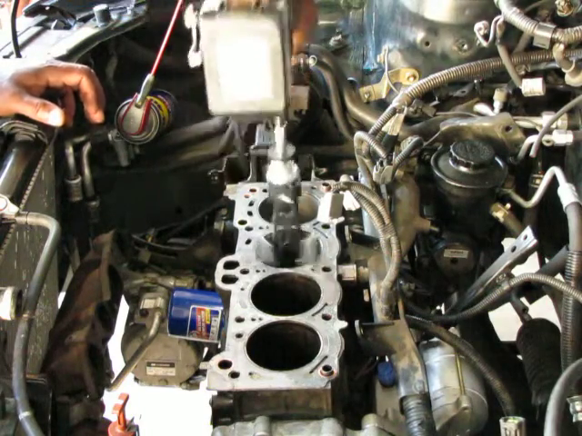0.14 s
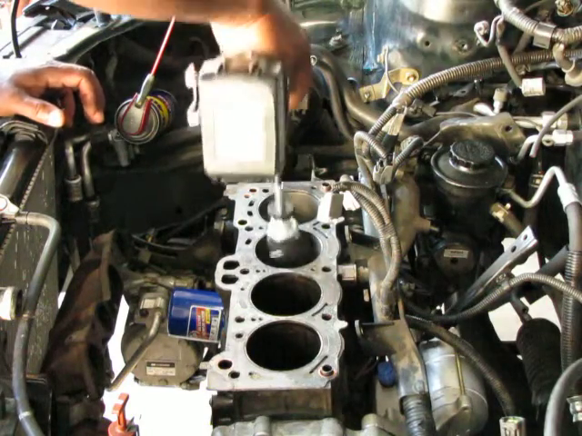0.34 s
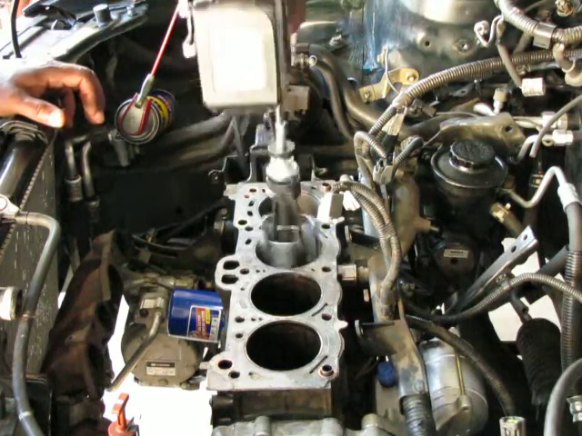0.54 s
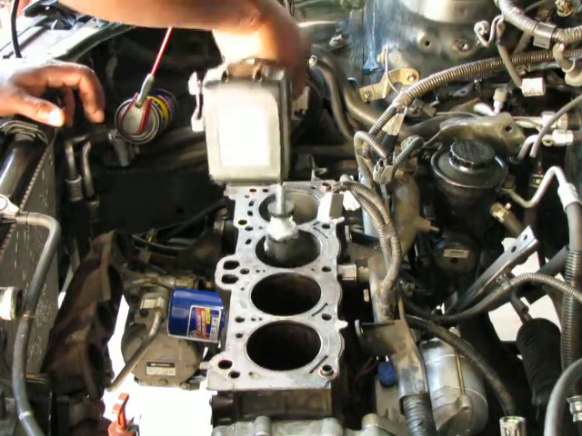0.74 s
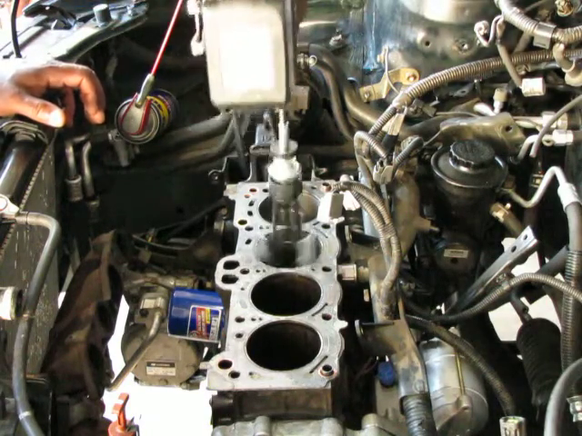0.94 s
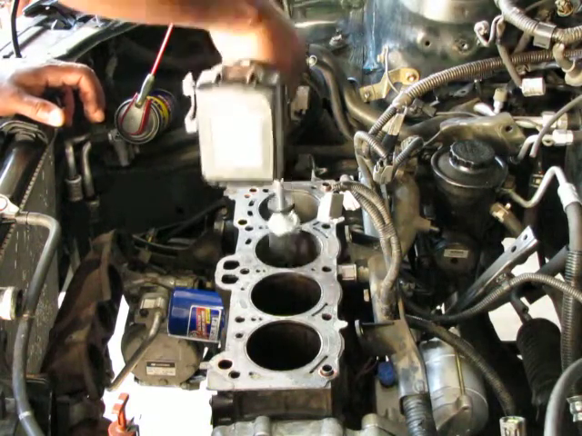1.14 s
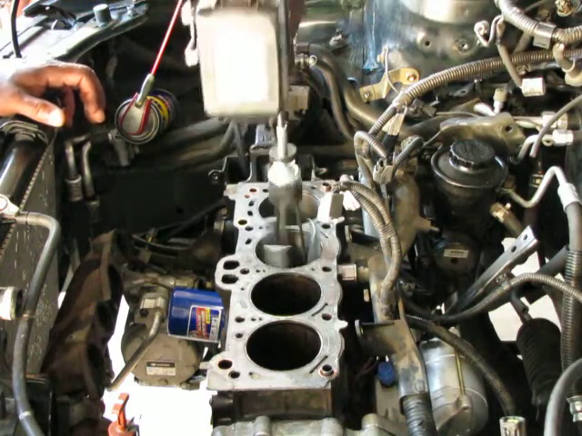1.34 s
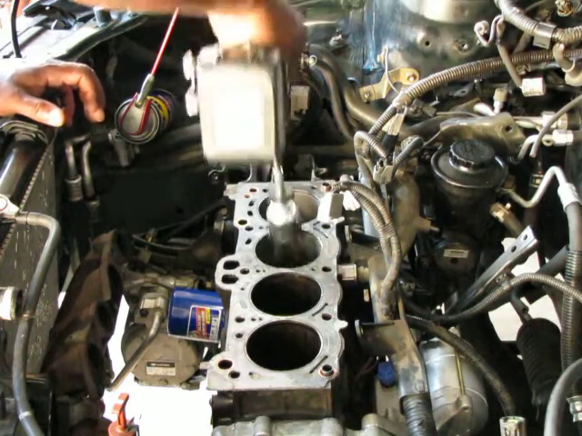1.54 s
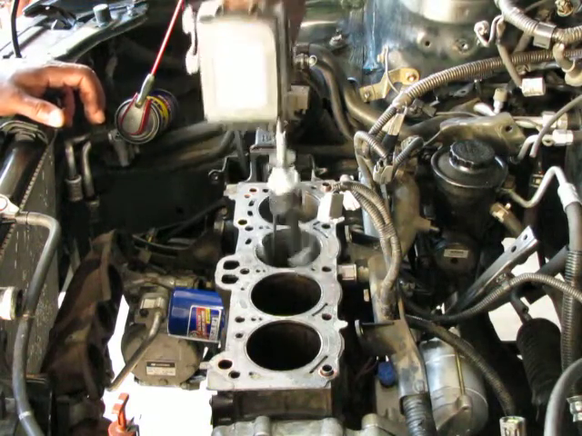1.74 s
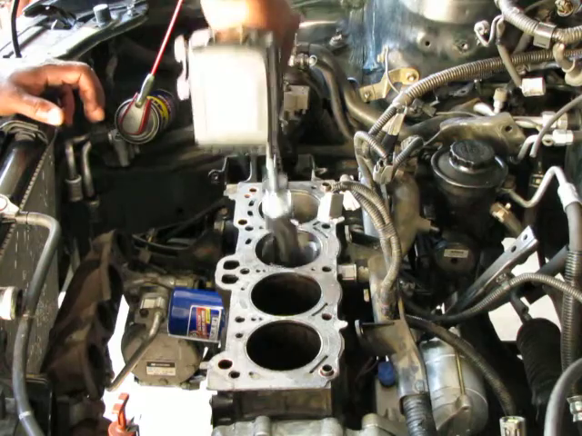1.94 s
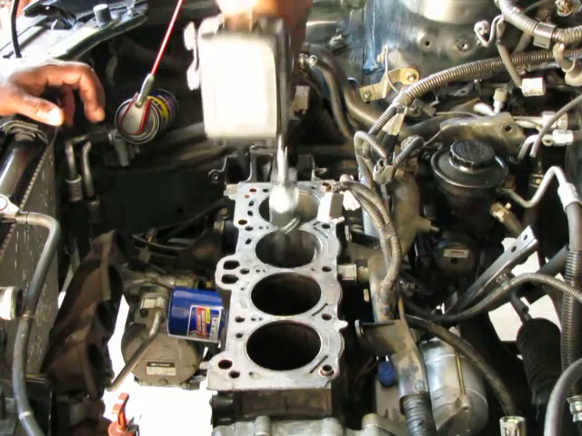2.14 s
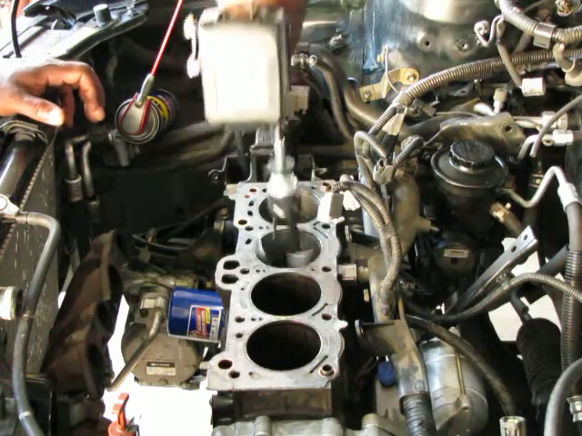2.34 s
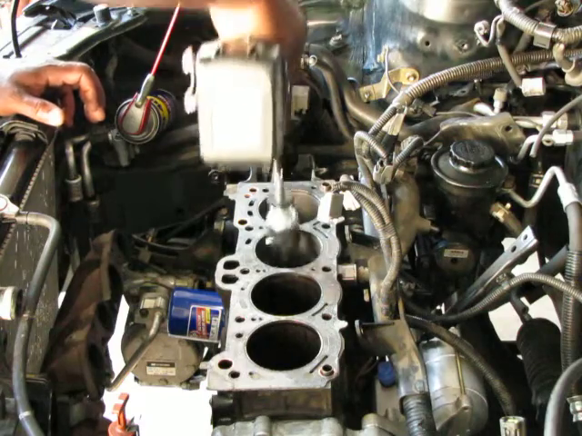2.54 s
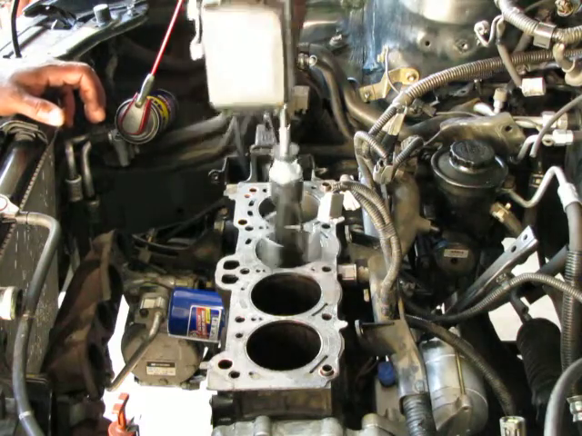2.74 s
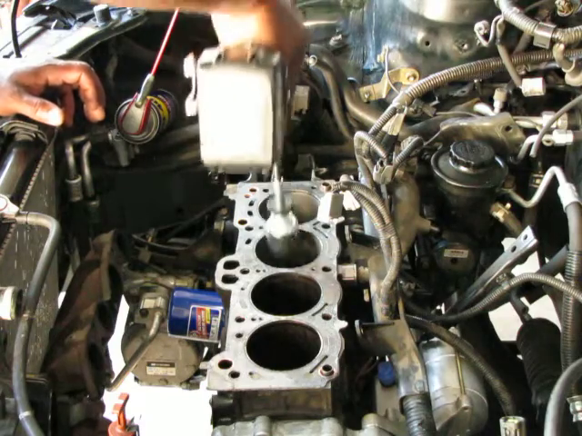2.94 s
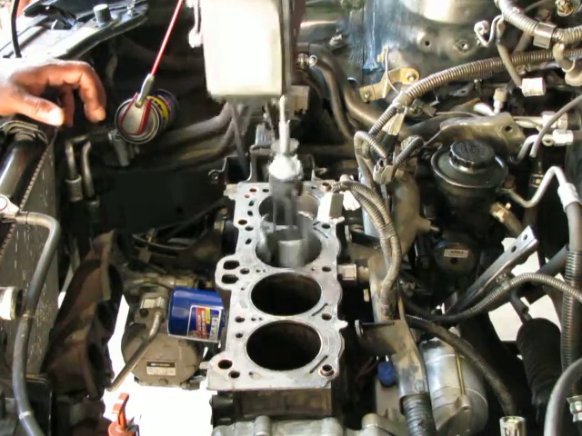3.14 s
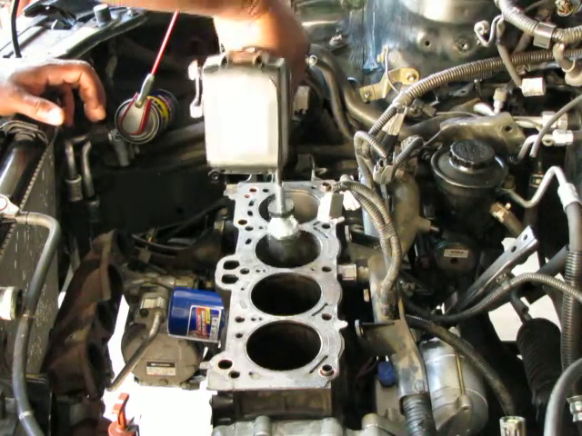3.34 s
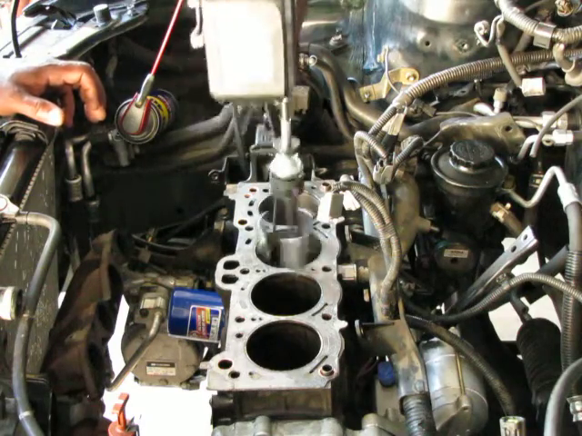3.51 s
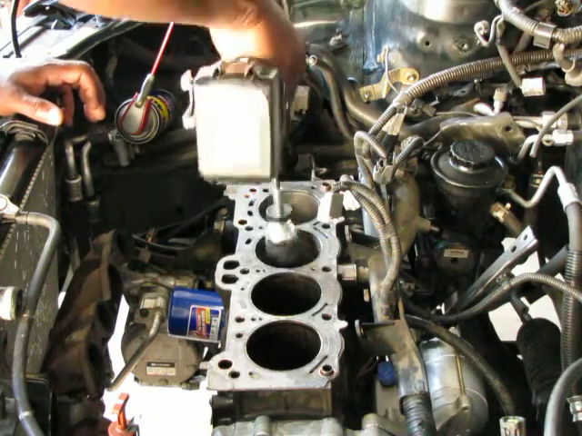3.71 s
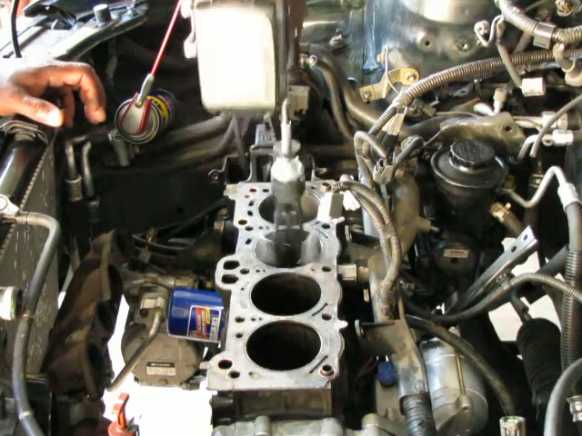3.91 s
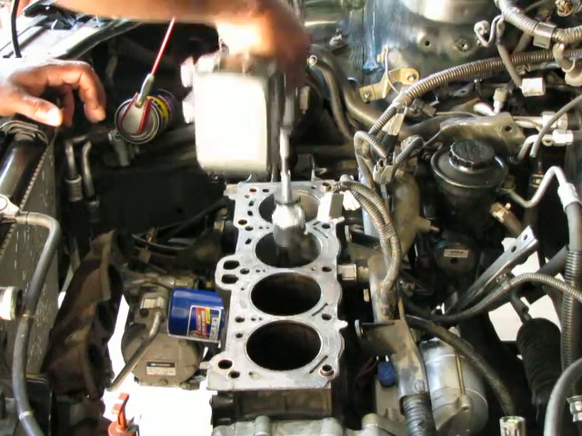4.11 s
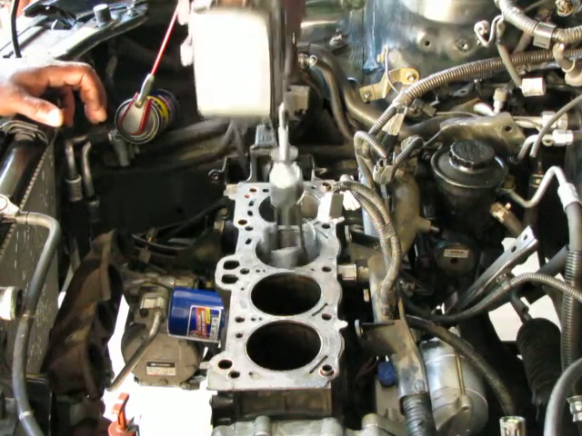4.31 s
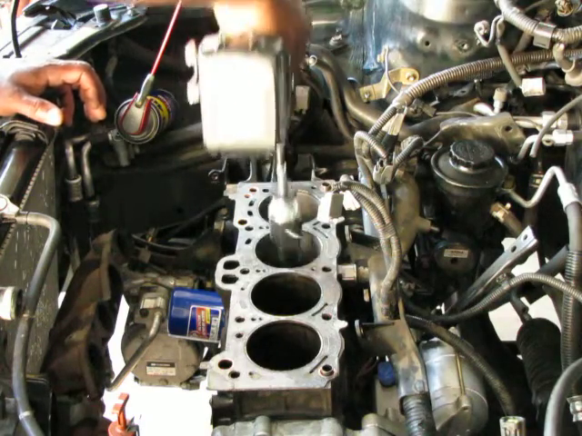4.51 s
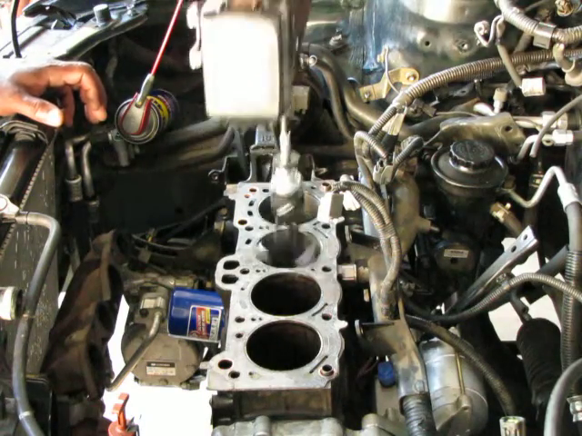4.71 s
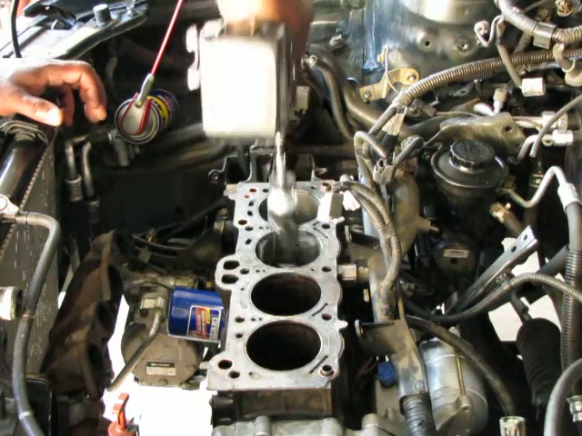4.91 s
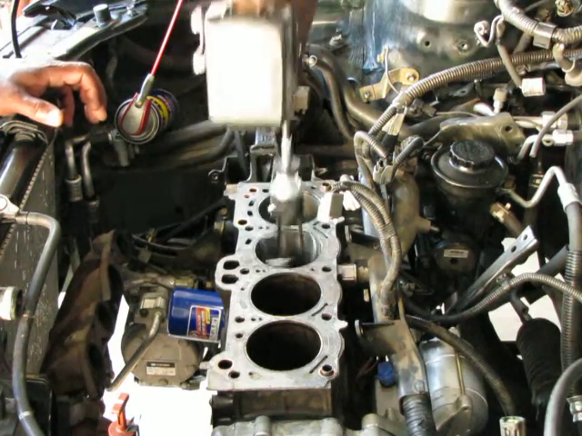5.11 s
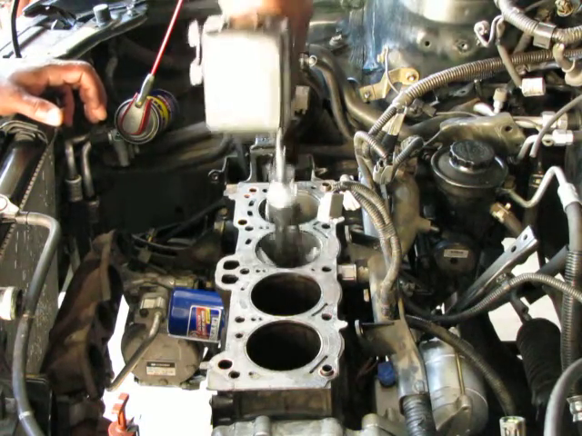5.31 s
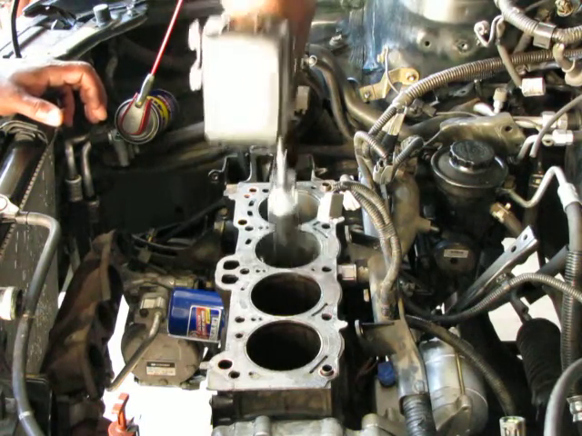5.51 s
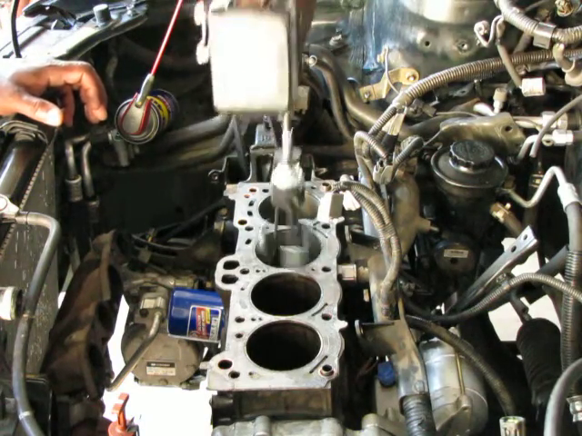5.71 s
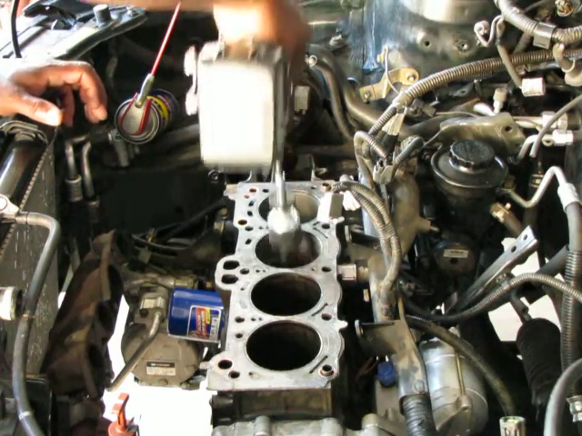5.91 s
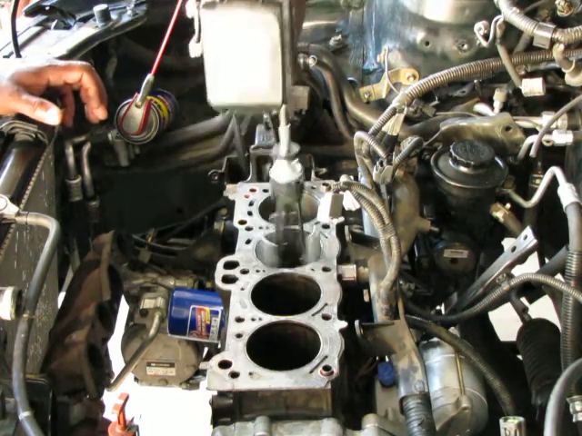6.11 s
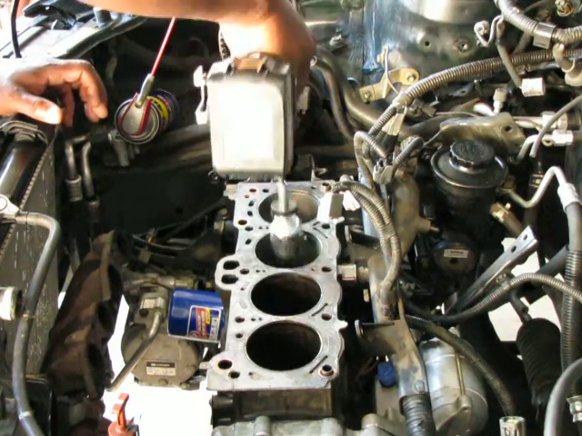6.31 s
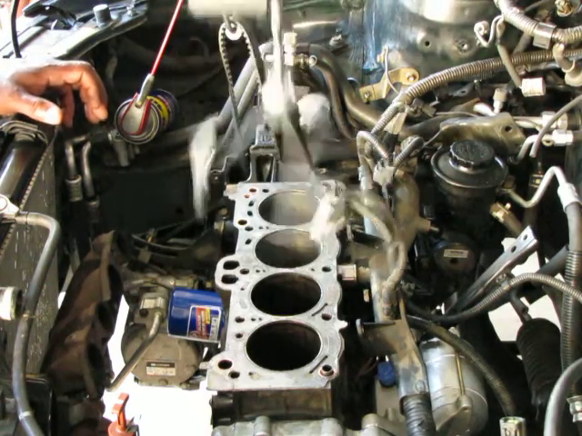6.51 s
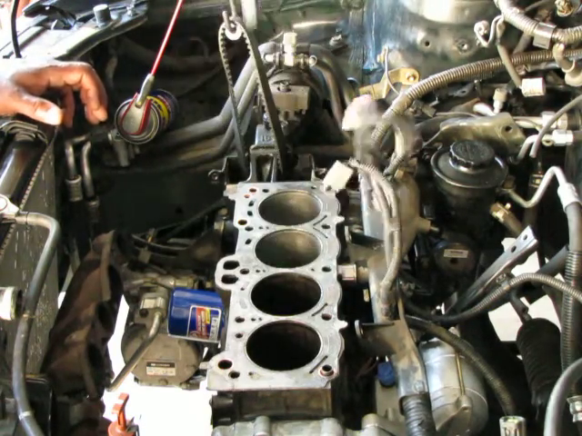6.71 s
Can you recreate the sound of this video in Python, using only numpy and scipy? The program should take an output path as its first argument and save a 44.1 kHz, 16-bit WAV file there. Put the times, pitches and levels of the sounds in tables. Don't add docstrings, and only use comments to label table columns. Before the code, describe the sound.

A cordless drill whines at high pitch as a hone hisses up and down an iron engine cylinder, knocking sharply, then stops and clatters out.

```python
import sys
import numpy as np
from scipy import signal
from scipy.io import wavfile
from scipy.ndimage import uniform_filter1d

SR = 44100
rng = np.random.default_rng(int(sys.argv[2]) if len(sys.argv) > 2 else 0)


def ratio(d):
    e = np.asarray(d, float) / 20
    return 10 ** e


def file_out(sig):
    cols = np.atleast_2d(sig).T
    lim = np.clip(cols, -1, 1)
    pcm = np.round(lim * 32767).astype(np.int16)
    wavfile.write(sys.argv[1], SR, pcm)


N = 297675
T = np.arange(N) / SR
LEFT_RIGHT = np.array([[1], [-1]])
EASE_S = 6.4


def rms_one(x):
    return x / np.sqrt(np.mean(x ** 2) + 1e-20)


def in_time(rows):
    s, *columns = np.transpose(rows)
    return [np.interp(T, s, column) for column in columns]


def at_hz(points, hz):
    table_hz, value = np.array(points).T
    return np.interp(np.log(hz), np.log(table_hz), value)


def drift(rate_hz):
    r = np.exp(-80 * np.pi * rate_hz / SR)
    white = rng.standard_normal(N // 40 + 2002)
    slow = signal.lfilter([1], [1, -2 * r, r * r], white)[2000:]
    return np.interp(np.arange(N) / 40, np.arange(len(slow)), rms_one(slow))


def resonate(x, hz, width_hz):
    r = np.exp(-np.pi * width_hz / SR)
    poles = [1, -2 * r * np.cos(2 * np.pi * hz / SR), r * r]
    return signal.lfilter(np.array([1, 0, -1]) * (1 - r * r) / 2, poles, x)


def add(out, s, x):
    i = round(max(s, 0) * SR)
    out[..., i:i + x.shape[-1]] += x[..., :N - i]


# start_s [s] where the sag is deepest, sag [turns/s], recovery_s [s]
BINDS = [(-0.016, 21.7, 0.167), (0.308, 18.1, 0.175), (0.673, 16.8, 0.15), (1.068, 10.3, 0.35),
         (1.536, 10.7, 0.324), (1.789, 9.3, 0.145), (2.188, 10.2, 0.141), (2.565, 13.0, 0.28),
         (2.956, 11.2, 0.209), (3.285, 16.0, 0.172), (3.631, 12.2, 0.24), (4.103, 14.3, 0.271),
         (4.469, 10.8, 0.193), (4.782, 19.6, 0.155), (5.153, 20.8, 0.145), (5.535, 20.4, 0.214),
         (5.9, 15.8, 0.22), (6.243, 19.6, 0.14), (6.603, 13.5, 0.35)]


def speed():
    start_s, sag, recovery_s = np.transpose(BINDS)
    u = (T[::64, None] - start_s) / recovery_s
    u = np.where(u < 0, -u / 0.69, u)
    free_turns_per_s = 332.7
    return np.interp(T, T[::64], free_turns_per_s - np.exp(-u ** 1.9) @ sag)


# start_s [s], pressure_db [dB], first_mesh_db, second_mesh_db, third_mesh_db [dB] as it tips
STONES = [(0, 7, -16, -3, -2), (.25, 4, 1, -6, 2), (.5, 0, -3, -10, 1.5), (.8, -1, -2, 0.5, 1.5),
          (1.2, .5, -0.5, -1.5, -8), (1.7, -1, -3.5, -1, 2), (2.2, -0.5, -1.5, -4, -1),
          (2.6, 1, -1.5, 1.5, 0), (3.1, 0, -1.5, -6, 0), (3.6, 1, -1.5, -3, -2), (4.1, 1.5, -2, 1, -3),
          (4.55, 5, -1.5, -4.5, 2), (4.8, 2.5, -1, -1.5, 4), (5.05, 3.5, 0, -3.5, 1), (5.5, 2.5, -2, 4, 5),
          (5.75, 2.5, -0.5, 1, 3), (6.1, 4.5, -4, -4.5, 2), (6.3, 6.5, -6, 3, 2)]


def press():
    last_s, last_db = STONES[-1][:2]
    scuff_s, scuff_db = 6.5, 2.5
    held = np.interp(T, [last_s, EASE_S, scuff_s], [0, 1 - last_db, scuff_db - last_db])
    lift_s, lift_db_per_s, floor_db = 6.56, 181, -19.5
    lost = np.clip(lift_db_per_s * (T - lift_s), 0, scuff_db - floor_db)
    bright = np.interp(T, [EASE_S, scuff_s], [0.06, -1.0]) - 0.24 * lost
    return in_time(STONES)[0] + held - lost, bright


# pitch_hz [Hz], likeness of left and right [0 to 1]
LIKENESS = [(40, 0.57), (125, 0.82), (350, 0.92), (700, 0.96), (1400, 0.95), (2800, 0.7), (5600, 0.07),
            (12000, 0.062)]
# pitch_hz [Hz], left_minus_right_db [dB]
LEFT_DB = [(60, -2.5), (180, -1), (550, 0), (1650, -3), (4970, -1), (15000, 0.5)]


def tone(angle, hz, db, slow_db, fast_db, wobble):
    beads = drift(22)
    beads = rms_one(beads - uniform_filter1d(beads, size=SR // 6))
    beads = np.minimum(beads, 1.4)
    level = db + slow_db * drift(5) + fast_db * beads
    level = level + LEFT_RIGHT * (1.2 * min(hz / 2000, 1) * drift(5) + at_hz(LEFT_DB, hz) / 2)
    unlike = 1 - np.clip(at_hz(LIKENESS, hz), 0, 1)
    spread = unlike * LEFT_RIGHT * np.tanh(.8 * drift(4))
    phase = angle + wobble * drift(25) + spread + rng.uniform(0, 2 * np.pi)
    return np.sqrt(2) * ratio(level) * np.sin(phase)


MESH_DB = [-30.5, -27.5, -34.5, -44]
MESH_FLICKER_DB = [3, 4.3, 2.2, 2]
MESH_DULL_DB = [-.15, -.4, -.25, -.1]
# order [multiple of shaft speed], level_db [dB rms]
SHAFT = [(1, -56), (2, -58), (4, -55), (6, -50), (8, -47), (11, -45.5), (12, -45), (14, -49), (16, -48),
         (19, -38), (21, -35), (22, -37.5), (23, -47), (29, -49), (31, -47), (41, -60)]
# order [hundredths of shaft speed], level_db [dB rms]
PLANETS = [(44, -63), (58, -66), (165, -64), (220, -57), (253, -60), (841, -51), (953, -50), (1039, -44)]


def drill():
    turns, tip = speed(), in_time(STONES)[1:]
    angle, mean = 2 * np.pi * np.cumsum(turns) / SR, np.mean(turns)
    unload = sum(np.exp(-((T[::64] - s) / 0.043) ** 2) for s, *_ in RASPS[:15])
    falter = -3 * np.interp(T, T[::64], unload)
    falter = falter + np.interp(T, [STONES[-1][0], EASE_S], [0, -7])
    out = 0
    for k, db in enumerate(MESH_DB):
        order = 10 * (k + 1)
        level = db + tip[[0, 1, 2, 1][k]] + MESH_DULL_DB[k] * (mean - turns) + falter
        out = out + tone(order * angle, order * mean, level, 0, MESH_FLICKER_DB[k], .2 + .13 * k)
    for order, db in SHAFT:
        out = out + tone(order * angle, order * mean, db, 1.5, 3.2, .1 + .012 * order)
    for hundredths, db in PLANETS:
        order = hundredths / 100
        out = out + tone(order * angle, order * mean, db, 2.5, 3, .4)
    stop_s, stop_t60_s = 6.48, 0.19
    return out * ratio(0.5 + press()[0] - 60 * np.maximum(T - stop_s, 0) / stop_t60_s)


# pitch_hz [Hz], level_db [dB]
HISS = [(15, -65), (25, -16.5), (137, -23.5), (284, -28), (316, -30), (437, -26.5), (637, -19.5),
        (2030, -8.5), (3220, -3), (4100, -5), (6490, -5), (8050, -7), (9720, -7.5), (12700, -18.5),
        (15800, -14)]
# pitch_hz [Hz], tilt [octaves]
TILT = [(100, 0), (1000, -2), (4000, 0), (16000, 2)]
# pitch_hz [Hz], width_hz [Hz], level_db [dB]
BODY = [(5000, 1700, 4), (6440, 1800, -1), (8300, 300, 3.5), (11100, 520, -0.5), (12300, 560, 3)]


def stones():
    pressure, bright = press()
    clicks = rng.random(N) < 900 / SR
    grit = 1 + .5 * clicks * ratio(2.6 * np.minimum(rng.exponential(1, N), 4))
    turn = 2 * np.pi * np.cumsum(speed()) / SR
    throb = 1 + .15 * np.sin(turn + drift(3))
    white = rng.standard_normal((2, 2, N)) * uniform_filter1d(grit, size=9) * throb
    together = 1.0 * drift(2.9) + 0.58 * drift(30.0)
    edges = 22 * 2 ** np.arange(0, 9.7, .4)
    out = 0
    for k, (low, high) in enumerate(zip(edges, edges[1:])):
        band = signal.butter(2, [low, high], "band", fs=SR, output="sos")
        mid, side = signal.sosfilt(band, white[k % 2])
        hz = np.sqrt(low * high)
        alike = np.clip(at_hz(LIKENESS, hz), 0, 1)
        left = ratio(at_hz(LEFT_DB, hz) / 2 * LEFT_RIGHT)
        gain = ratio(at_hz(HISS, hz) + together + 1.1 * drift(17.5) + bright * at_hz(TILT, hz))
        out = out + left * gain * (np.sqrt(1 + alike) * mid + np.sqrt(1 - alike) * side * LEFT_RIGHT)
    for hz, width_hz, db in BODY:
        out = out + (ratio(db) - 1) * resonate(out, hz, width_hz)
    return ratio(-22.5 + pressure) * out / np.sqrt(np.mean(out[:, :6 * SR] ** 2))


# peak_s [s], level_db [dB rms]
SWELLS = [
    (1.5, -36),
    (3.5, -39),
    (4.8, -28.5),
    (5.2, -30),
    (5.8, -34),
    (6.3, -27),
]


def bore():
    hz, width_hz = 4460, 91
    mid, side = resonate(resonate(rng.standard_normal((2, N)), hz, width_hz), hz, width_hz)
    swells = [db - 51 * abs(T - s) for s, db in SWELLS]
    level = np.max(swells + [np.full(N, -40)], axis=0)
    level = level - 60 * np.maximum(T - EASE_S, 0) / .5
    return ratio(level) * rms_one(mid + 0.1 * side * LEFT_RIGHT)


def rumble():
    band = signal.butter(2, [30, 500], "band", fs=SR, output="sos")
    mid, side = signal.sosfilt(band, rng.standard_normal((2, N)))
    return ratio(-57.5) * rms_one(mid + 0.13 * side * LEFT_RIGHT)


def ports(shape, unlike):
    mid, side = rng.standard_normal((2, len(shape)))
    return shape * (mid + unlike * side * LEFT_RIGHT)


# pitch_hz [Hz], width_hz [Hz], level_db [dB]
IRON = [(1360, 140, -9.5), (2500, 17, -2), (3180, 160, -8.5), (4130, 13, -29), (4810, 220, -5),
        (5200, 49, 3.5), (5350, 390, 1), (7000, 160, 0), (7230, 60, 4.5), (8040, 31, 4), (8800, 62, 7),
        (13400, 170, -2.5)]


def iron(x, hz, ring_db):
    out = resonate(resonate(x, hz, 1.2 * hz), hz, 1.2 * hz)
    for k, (mode_hz, width_hz, db) in enumerate(IRON):
        near = -6 * abs(np.log2(mode_hz / hz))
        strike = near + rng.normal(0, 3)
        out = out + (-1) ** k * ratio(ring_db + db + strike) * resonate(x, mode_hz, 3 * width_hz)
    return out


# start_s [s],
# length_s [s], level_db [dB rms], pitch_hz [Hz]
RASPS = [(0, 0.023, -22, 5000), (0.028, 0.015, -29, 6000), (0.383, 0.023, -18.5, 4300),
         (0.742, 0.051, -28.5, 3460), (1.119, 0.029, -25.5, 2560), (1.483, 0.038, -24.5, 2500),
         (1.874, 0.026, -23, 3000), (2.226, 0.048, -26.5, 2980), (2.582, 0.041, -23, 3160),
         (2.981, 0.036, -25.5, 2500), (3.333, 0.019, -27, 2500), (3.705, 0.053, -22, 2960),
         (4.048, 0.028, -19, 3500), (4.442, 0.014, -16, 3350), (4.457, 0.013, -19.5, 3490),
         (4.816, 0.013, -27, 4500), (5.116, 0.019, -24, 5300), (5.574, 0.034, -27, 6300),
         (5.946, 0.014, -22, 6370), (6.28, 0.035, -27, 2970), (6.545, 0.015, -35, 3020)]


def rasps():
    out, t = np.zeros((2, N)), T[:SR // 8]
    for s, length, db, hz in RASPS:
        slips = rng.standard_normal(len(t) // 64 + 1)
        chatter = ratio(2.5 * np.repeat(slips, 64)[:len(t)])
        fade = np.clip((length - t) / .007 + 1, 0, 1)
        shape = np.clip(t / .003, 0, 1) * fade * np.exp(-.5 * t / length)
        x = iron(ports(shape * chatter, unlike=.5), hz, ring_db=4)
        add(out, s, ratio(db) * x / np.sqrt(np.sum(x ** 2) / (2 * length * SR)))
    return out


# start_s [s], level_db [dB peak], pitch_hz [Hz], t60_s [s]
KNOCKS = [(0.021, -3, 4790, 0.034), (0.0294, -9, 6230, 0.022), (0.3714, -3, 4700, 0.031),
          (0.416, -0.5, 5100, 0.025), (0.4443, -2, 6300, 0.026), (0.4584, -9, 8390, 0.04),
          (0.786, -2.5, 6340, 0.024), (0.7953, -10, 7000, 0.025), (1.1454, -13, 6410, 0.023),
          (1.887, -5, 5530, 0.026), (2.2503, -2.5, 5220, 0.027), (2.612, -6, 6400, 0.084),
          (4.0786, -2.5, 6950, 0.022), (4.4863, 0, 7900, 0.031), (4.744, -10.5, 5240, 0.041),
          (4.852, -8.5, 6340, 0.029), (5.0752, -12, 6340, 0.021), (5.6053, -3, 7650, 0.029),
          (5.9714, -3, 6300, 0.028), (6.3313, 1.5, 6750, 0.029)]
# start_s [s], level_db [dB peak], pitch_hz [Hz], t60_s [s]
CLATTER = [
    (6.478, -8.5, 7000, 0.032),
    (6.4813, -4.5, 3400, 0.046),
    (6.5036, -7, 3480, 0.011),
    (6.5085, -8, 4500, 0.011),
    (6.5128, -9, 5200, 0.018),
    (6.536, -13, 4500, 0.027),
    (6.6085, -13, 2180, 0.023),
    (6.6965, -27, 5000, 0.027),
    (6.7382, -19, 4850, 0.045),
]


def knocks():
    out, t = np.zeros((2, N)), T[:SR // 8]
    for s, db, hz, t60 in KNOCKS + CLATTER:
        shape = np.clip(t / 0.0006, 0, 1) * ratio(-60 * np.maximum(t - .002, 0) / t60)
        x = iron(ports(shape, unlike=.45), hz, ring_db=5)
        first_5_ms = x[:, :SR // 200]
        add(out, s - .001, ratio(db - 11.0) * x / np.sqrt(np.mean(first_5_ms ** 2)))
    return out


# start_s [s], level_db [dB peak], pitch_hz [Hz]
THUMPS = [(0.389, -47, 248), (.4, -45, 700), (.74, -52, 500), (1.49, -32, 1700), (1.879, -46, 400),
          (2.25, -48, 540), (2.6, -45, 500), (2.991, -42.5, 346), (3.36, -41, 535), (4.056, -36.5, 646),
          (4.453, -40.5, 304), (6.3, -38, 450), (6.479, -44, 600), (6.504, -26.5, 1360), (6.608, -30, 1120)]


def thumps():
    out, t = np.zeros((2, N)), T[:SR // 8]
    block_hz, block_width_hz, block_db = 535, 31, 3
    for s, db, hz in THUMPS:
        decay_s = min(0.017, 7.7 / hz)
        push = ports(np.exp(-t / decay_s) * np.clip(t * hz / 2, 0, 1), unlike=.1)
        ring = ratio(block_db) * min(block_hz / hz, 1) ** 2 * resonate(push, block_hz, block_width_hz)
        x = resonate(resonate(push, hz, 0.74 * hz), hz, 0.74 * hz) + ring
        add(out, s, ratio(db - 3.5) * x / np.sqrt(np.mean(x[:, :SR // 50] ** 2)))
    return out


def garage(x):
    t = T[:SR // 2]
    tail = rng.standard_normal((2, len(t))) * ratio(-60 * t / 0.58) * (t > .006)
    tail = signal.lfilter([.4], [1, -.6], tail)
    tail = tail / np.sqrt(np.sum(tail ** 2, axis=1, keepdims=True))
    return ratio(-29) * signal.fftconvolve(x, tail, axes=1)[:, :N]


# start_s [s], level_db [dB] it is pushed down to, or at 6.52 s let up to
DUCKS = [(0, -5.5), (.04, -7), (0.46, -12), (.797, -8), (1.893, -2), (2.258, -5), (2.622, -6.5),
         (4.086, -4), (4.492, -13), (5.611, -8), (5.979, -9.5), (6.34, -12), (6.52, -3.5)]


def gain_db():
    attack_s, release_s = 0.0053, 0.52
    target = np.zeros(N)
    for s, db in DUCKS:
        target = np.where(T >= s, db * np.exp(-np.maximum(T - s, 0) / release_s), target)
    r = np.exp(-1 / (attack_s * SR))
    return signal.lfilter([1 - r], [1, -r], target)


# pitch_hz [Hz], level_db [dB], t60_s [s]
FRAME = [(528, -46.5, 0.4), (1170, -39, 0.23), (1360, -25, 0.064), (1760, -38, 0.25)]


def frame():
    clicks, out = np.full(N, 1e-18), 0
    for s, db, hz, _ in CLATTER[2:]:
        clicks[round(s * SR)] = ratio(db + 6.5) * 2500 / hz
    for hz, db, t60 in FRAME:
        r, w = ratio(-60 / (t60 * SR)), 2 * np.pi * hz / SR
        out = out + ratio(db) * signal.lfilter([0, np.sin(w)], [1, -2 * r * np.cos(w), r * r], clicks)
    return out


def scene():
    steady = drill() + stones() + bore() + rumble()
    blows = rasps() + knocks() + thumps() + frame()
    return ratio(gain_db()) * (steady + garage(blows)) + blows


def band_limit(x):
    return signal.sosfilt(signal.butter(12, 15950, fs=SR, output="sos"), x)


def record(dry):
    late = np.stack([np.roll(dry[0], shift=1), dry[1]])
    late = late / (1 + np.abs(late / .92) ** 4) ** .25
    cut = signal.sosfilt(signal.cheby2(14, 70, 16300, fs=SR, output="sos"), late)
    cut = signal.sosfilt(signal.butter(2, 48, "high", fs=SR, output="sos"), cut)
    return band_limit(cut)


dry = scene()
out = record(dry)
file_out(out)
```